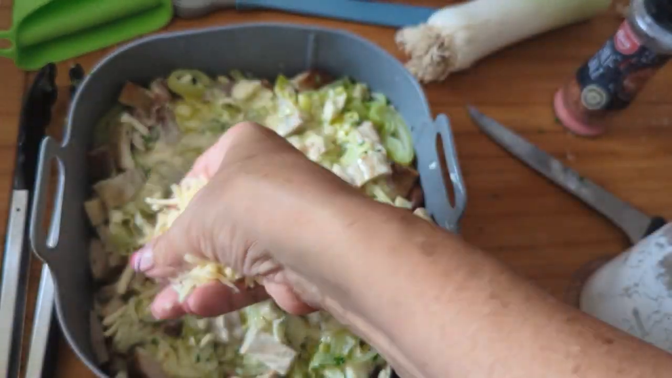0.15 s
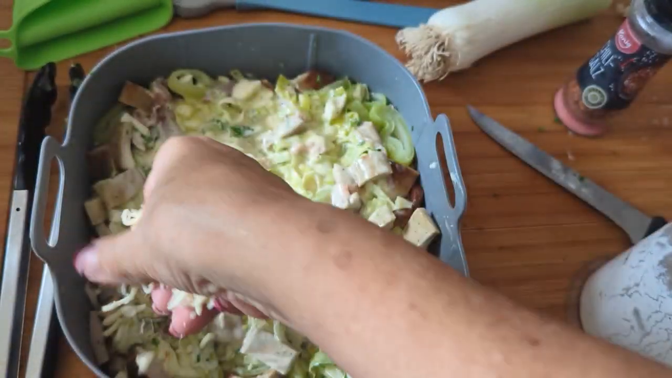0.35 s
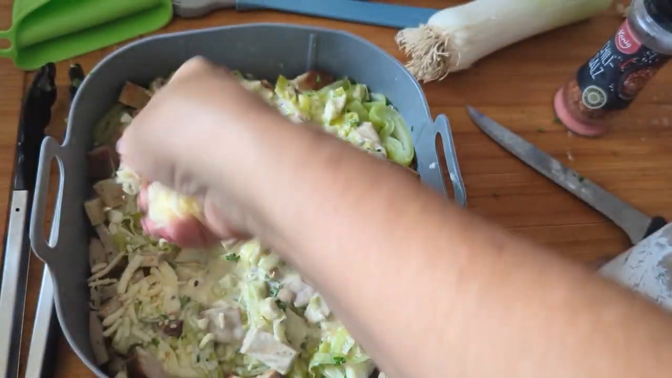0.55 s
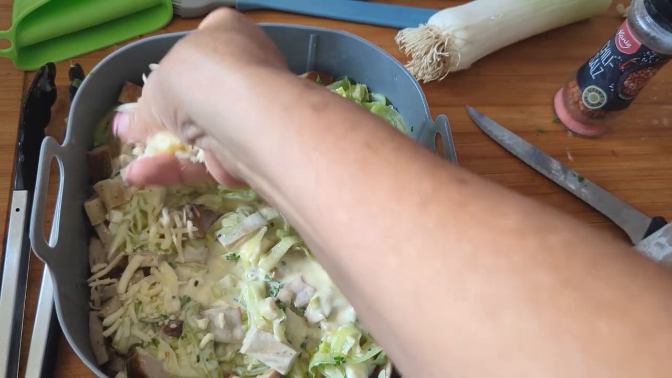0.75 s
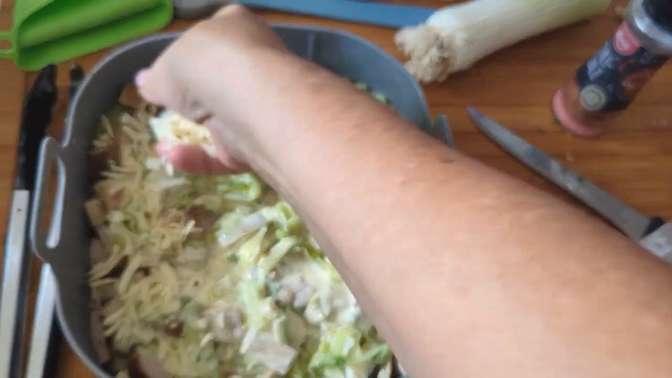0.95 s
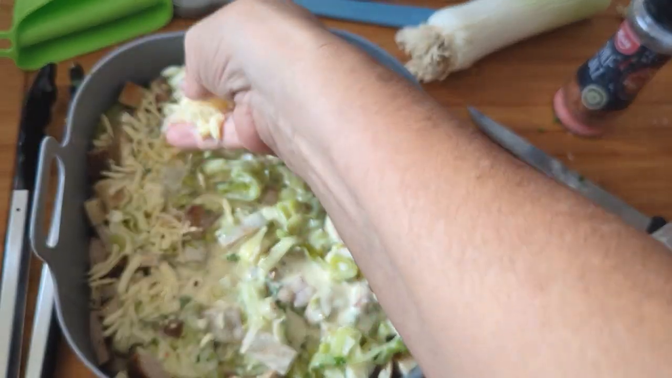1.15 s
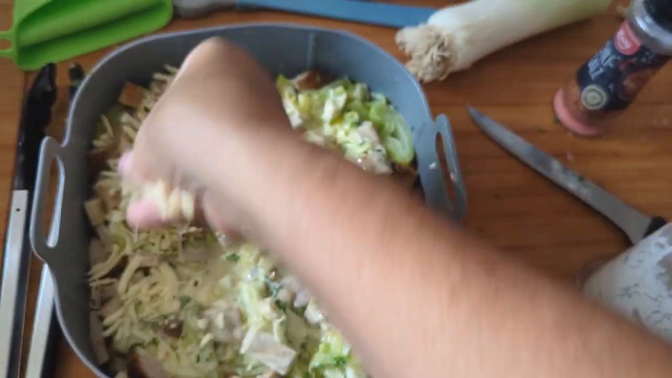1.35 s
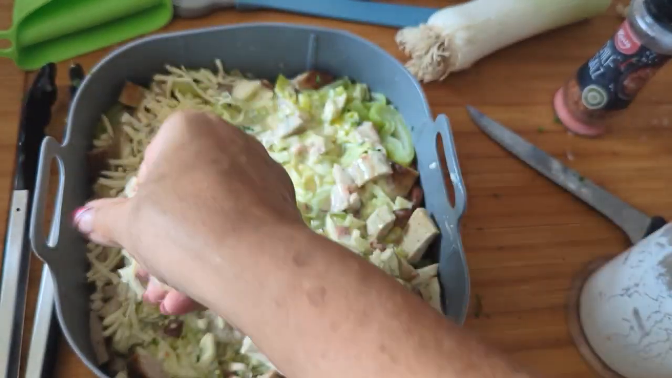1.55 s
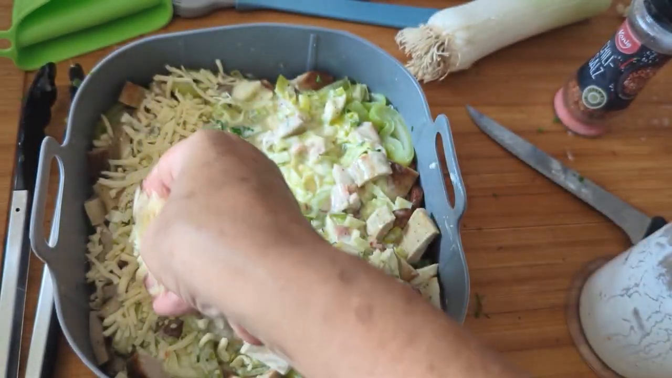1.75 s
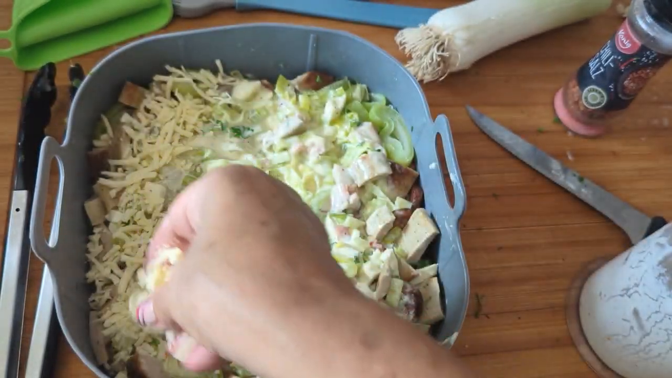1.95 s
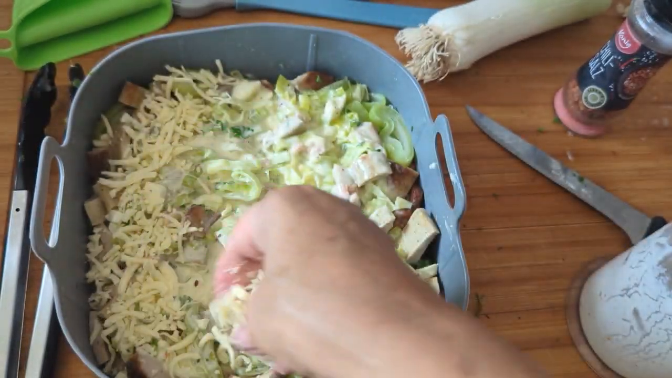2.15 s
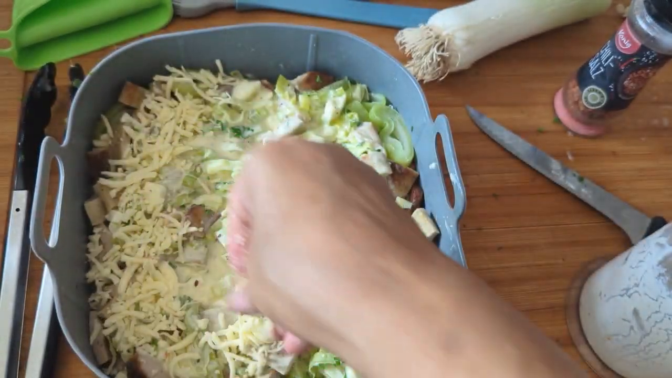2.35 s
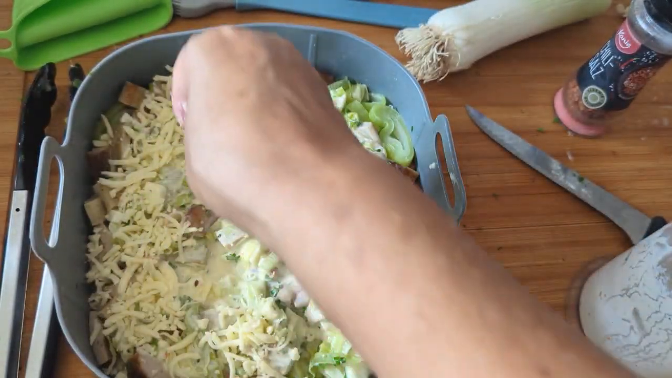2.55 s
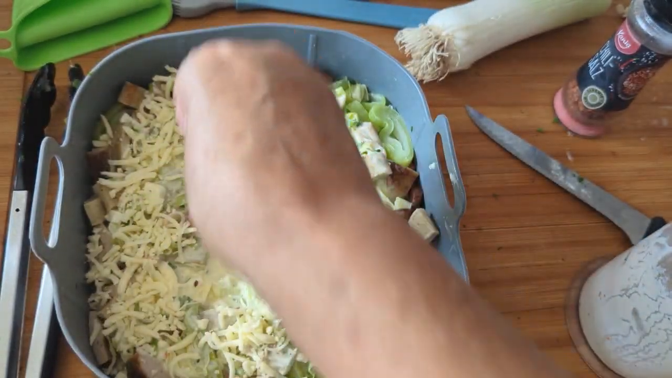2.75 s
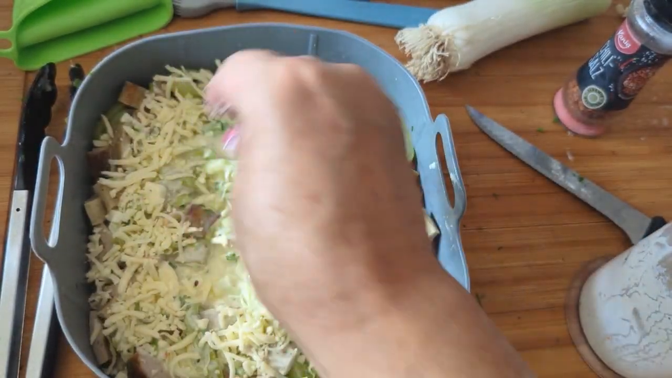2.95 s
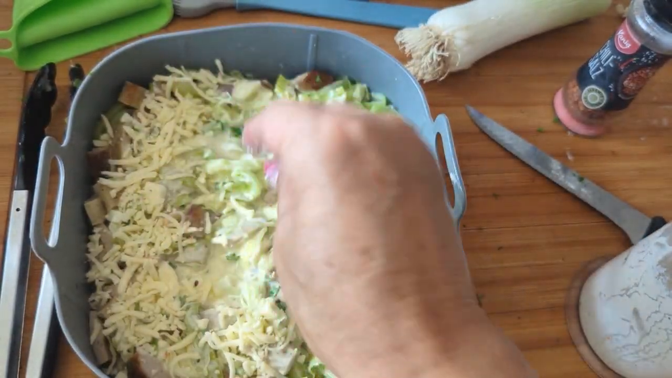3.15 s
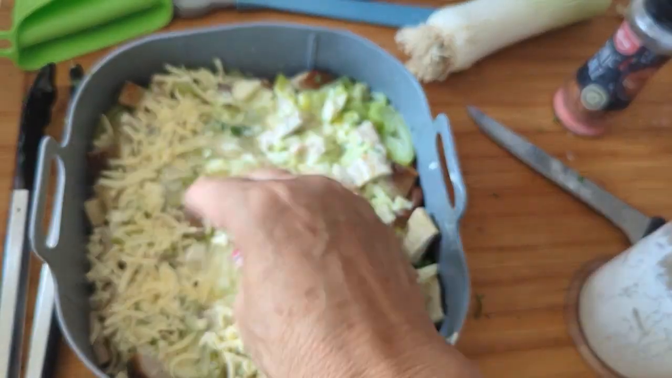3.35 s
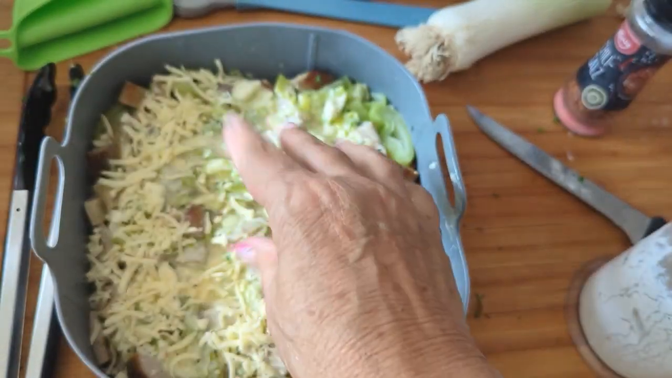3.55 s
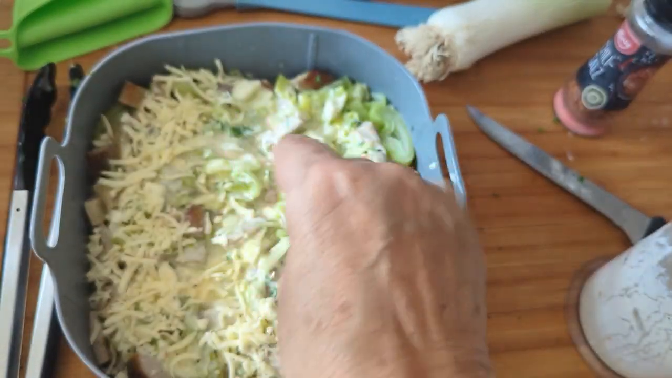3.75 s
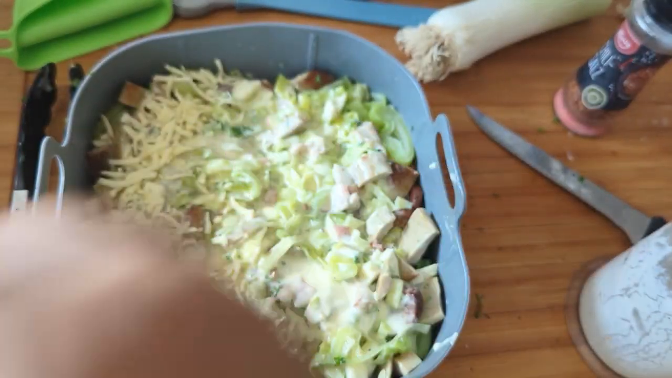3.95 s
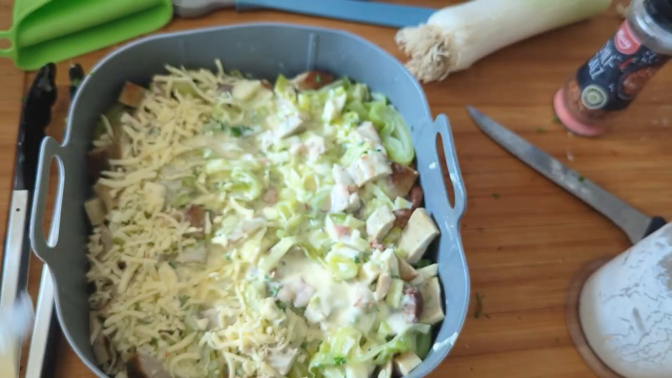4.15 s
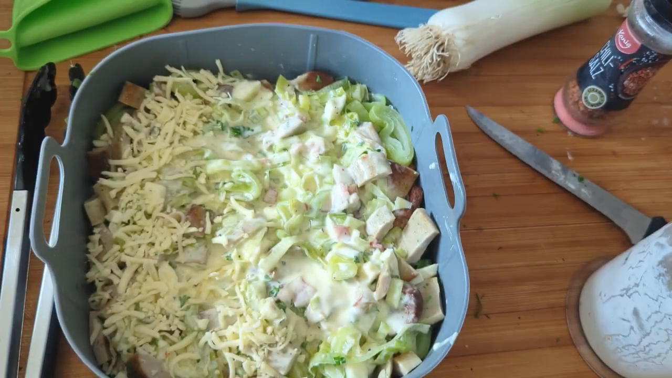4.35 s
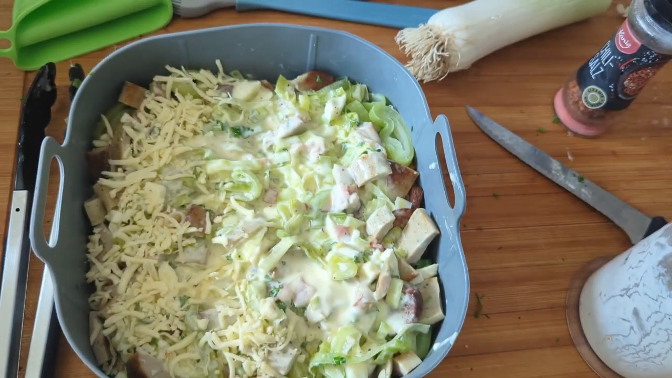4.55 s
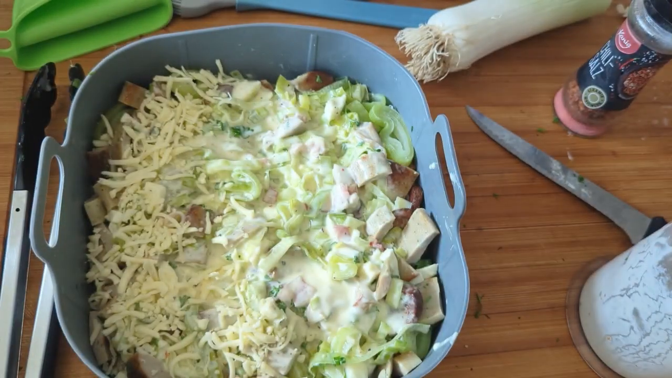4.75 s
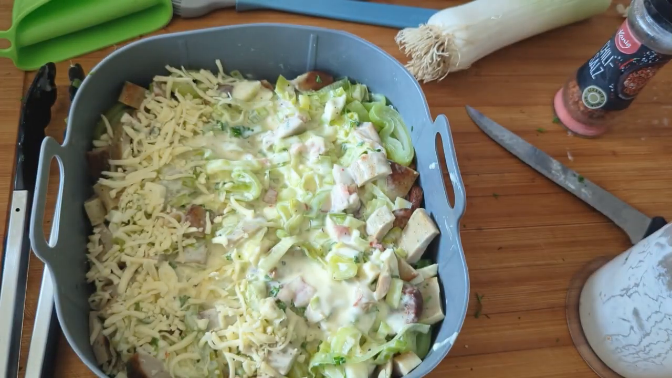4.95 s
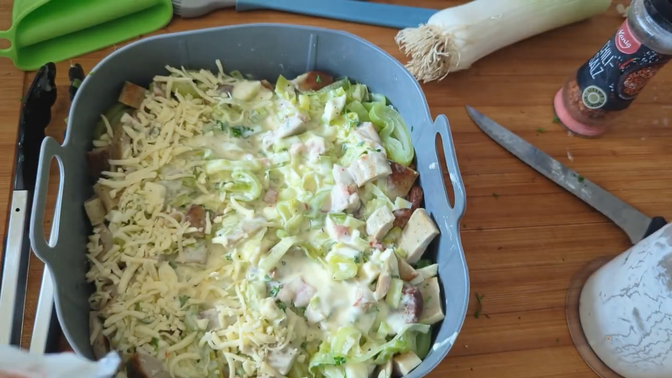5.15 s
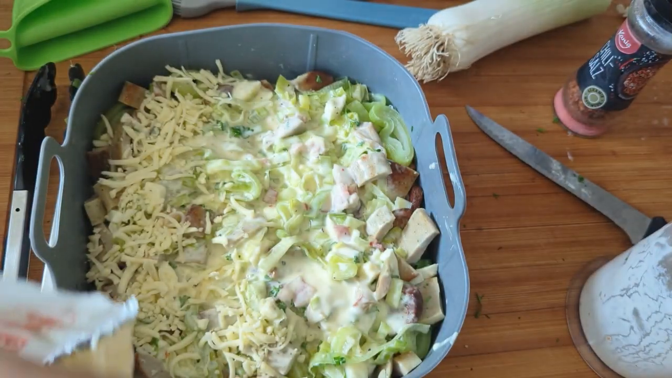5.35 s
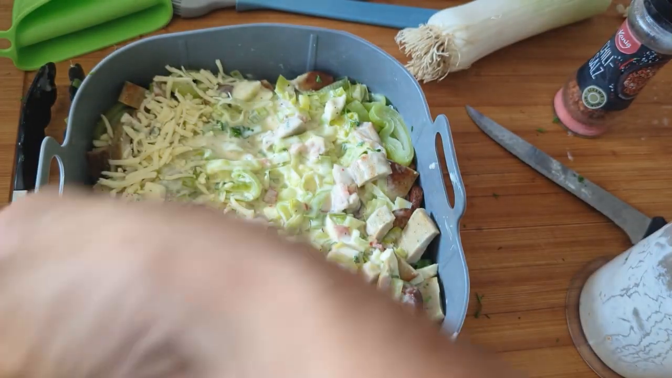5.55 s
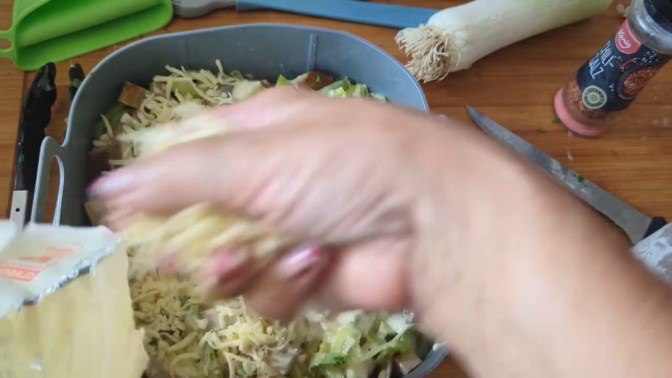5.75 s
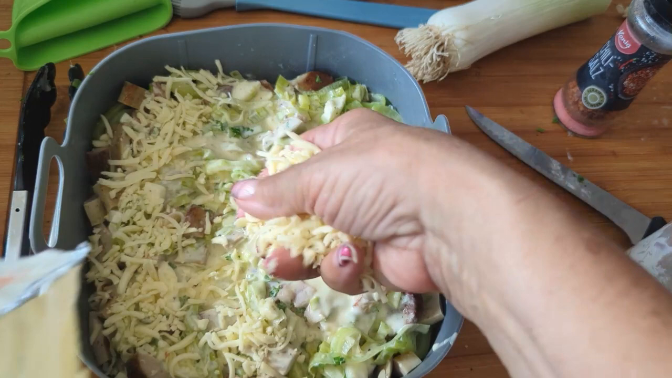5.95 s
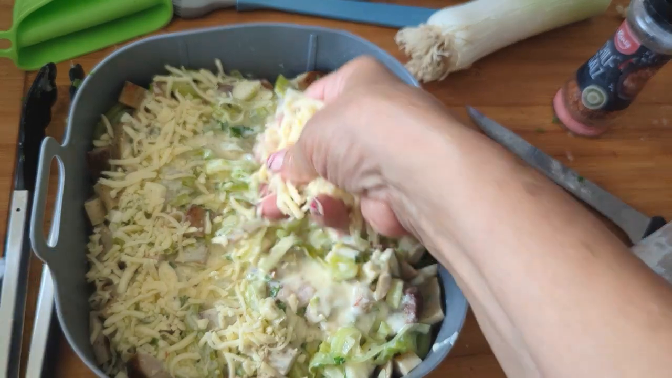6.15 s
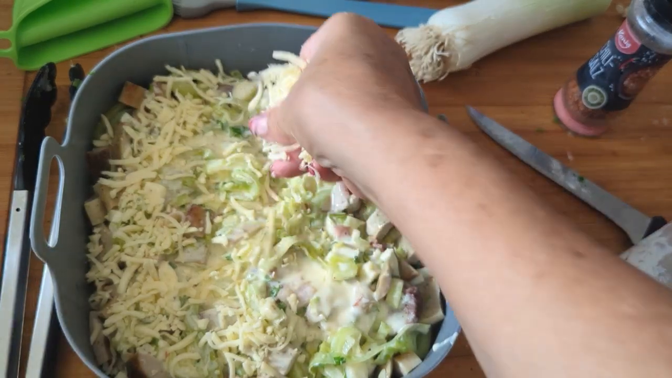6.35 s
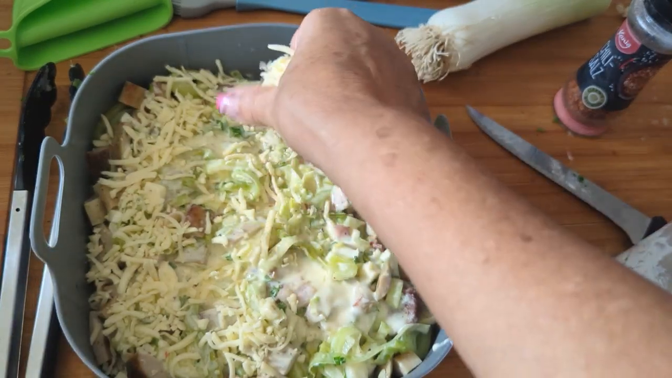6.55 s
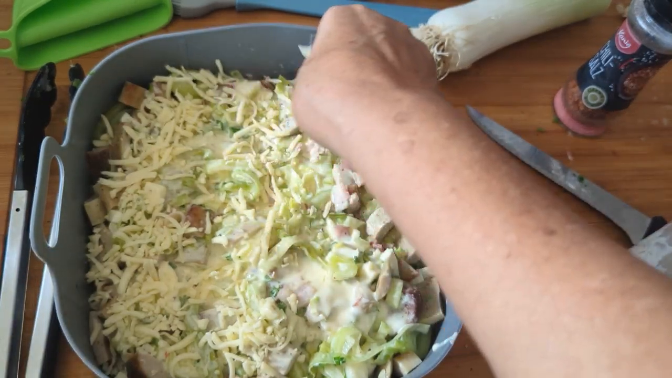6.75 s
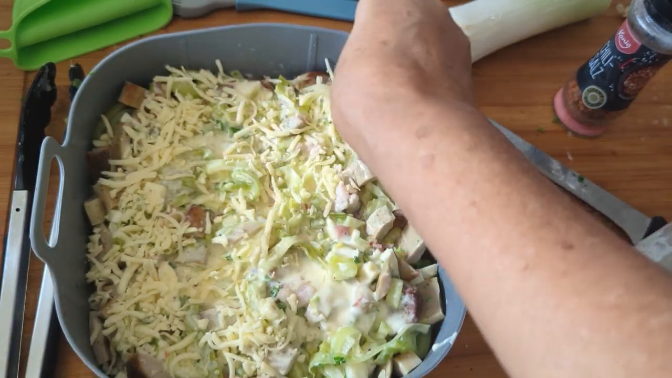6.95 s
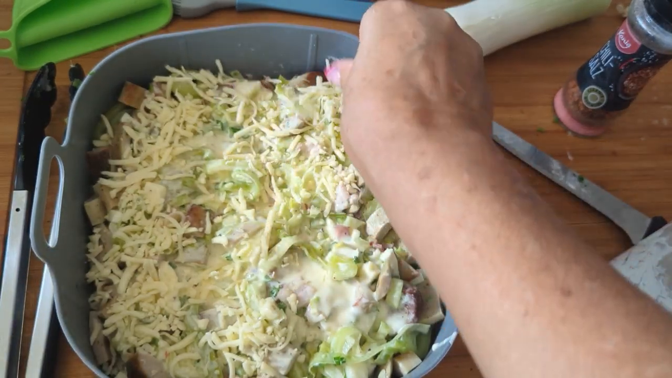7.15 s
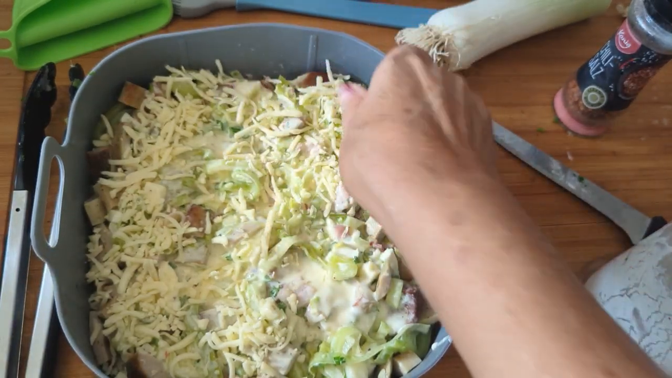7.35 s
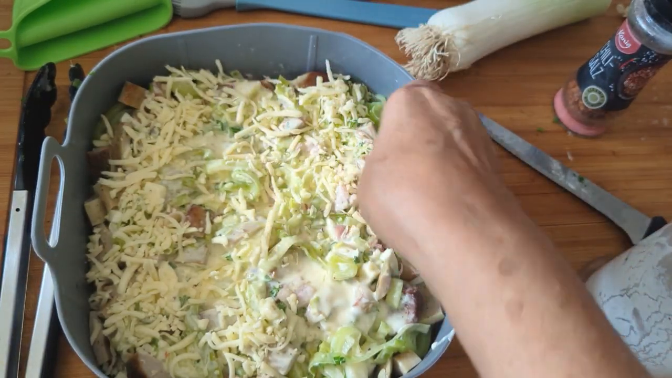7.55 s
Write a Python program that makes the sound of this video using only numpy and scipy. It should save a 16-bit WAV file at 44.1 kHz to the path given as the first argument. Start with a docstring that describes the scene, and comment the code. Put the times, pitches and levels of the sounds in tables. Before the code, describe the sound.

A plastic bag of grated cheese rustles and snaps close by for the first 0.7 seconds, with soft low thuds as the cheese shifts. From about 1 second, clumps land on a dish of food with faint, scattered pats. Between roughly 2 and 3.7 seconds, fingers rub the cheese apart and sticky shreds leave them with small moist ticks, a little clearer after 3 seconds. Near 3.8 seconds the hand digs into the bag again: dense crackling, sharp snaps and soft bumps, loudest between 4.2 and 4.9 seconds, with the strongest snap at about 4.7. The crinkling continues until nearly 6 seconds, with a distinct pat around 5.7. A few faint pats follow until about 7.6 seconds. A quiet low rumble, hum and faint hiss of a small kitchen lie underneath throughout.

```python
"""A plastic bag of grated cheese rustles as a hand digs in it, close by in a small kitchen.
Big creases in the plastic buckle with sharp snaps, while tiny ones make a dense crackle.
The cheese slumps with soft thuds. Between two handfuls, sticky shreds tick as they leave
the fingers, and clumps pat onto a dish of food. The room rumbles quietly underneath."""
import sys
import numpy as np
from scipy import signal
from scipy.fft import rfft, irfft, next_fast_len
from scipy.io import wavfile

SR = 44100
rng = np.random.default_rng(int(sys.argv[2]) if len(sys.argv) > 2 else 0)


def inscribe(sig):
    """Save sig as 16-bit PCM at rate SR to the path in sys.argv[1].

    A 1-D sig is mono; a 2-D sig holds one channel per row.
    Samples are clipped to [-1, 1] before scaling.
    """
    pcm = np.round(np.clip(np.atleast_2d(sig).T, -1, 1) * 32767)
    wavfile.write(sys.argv[1], SR, pcm.astype(np.int16))


N = 334939
TIME = np.arange(N) / SR

# Big creases buckle. Levels in all tables are relative; a positive side means left.
# (time [s], level [dB], pitch [Hz], hollowness [dB], tightness heard as treble [dB], side [dB])
SNAPS = [(0.08, -41, 2200, -10, -8, -11), (0.1814, -39, 1290, 1, 10.5, -9.5),
         (0.2219, -39, 6070, 8.5, -2, -4), (0.4304, -40, 1130, 2, -5.5, -10),
         (0.4842, -46.5, 5540, 10, 0, -4), (0.6254, -30.5, 900, -0.5, -2.5, -2.5),
         (3.468, -45, 2000, 0, -2, -7), (3.4825, -47.5, 12000, 4, -6, -1), (4.2019, -28, 2670, -6.5, 0, -1),
         (4.2521, -29, 4210, 3, -14.5, -5), (4.2886, -31, 5540, 2, 0.5, 2),
         (4.298, -36, 520, 10.5, 5.5, -3.5), (4.3515, -30, 12000, -4.5, -19, -3.5),
         (4.3836, -22, 3510, -6.5, -2.5, -6), (4.3984, -32, 3680, 16.5, -8.5, -4.5),
         (4.4243, -30.5, 1290, -2, -14.5, -1.5), (4.4273, -30, 1350, 3.5, -17, -3.5),
         (4.4373, -34.5, 520, -2, -18.5, -4.5), (4.4415, -31, 2800, 2, -13.5, -2),
         (4.5062, -37.5, 520, -5.5, -21, -3.5), (4.5341, -32.5, 5540, 11.5, -11, 1),
         (4.5521, -30, 1130, -2, -18.5, 3.5), (4.562, -30.5, 6350, 5.5, -3.5, -11.5),
         (4.5689, -36, 1620, 7.5, -13, 2.5), (4.5992, -34, 1080, 13, -10.5, -0.5),
         (4.6107, -31, 520, -8.5, -5, 1), (4.65, -33.5, 1410, 1, -16.5, -1),
         (4.6547, -30.5, 1780, 1.5, -14, -0.5), (4.6679, -29, 9130, -9, -10, -3.5),
         (4.7071, -17.5, 1030, 3.5, 11, 0.5), (4.7724, -34, 1620, -6, -18, -2.5),
         (4.782, -36.5, 1700, -3, -14, -1), (4.8844, -28, 5000, -8, -9.5, -0.5),
         (5.264, -39, 2800, -3.5, -30, -4), (5.2978, -34, 520, -9, -24, -1.5),
         (5.3483, -27, 8340, -8.5, -20, 1), (5.4907, -40, 1080, 11, -17, -5),
         (5.5971, -32.5, 1180, -8, -26, -5), (5.647, -35.5, 520, 17, -17, -13),
         (5.741, -38.5, 5060, -3, -24, -5), (5.7864, -37.5, 520, 15.5, -15.5, -2),
         (5.843, -52, 3070, -4, -5, 2), (5.9139, -55.5, 520, -1, -23, -4)]
# Tight corners of the plastic ping: (time [s], level [dB], pitch [Hz])
PINGS = [(0.3667,-48,7900),(0.4085,-42,7900)]
# The hand drags through the bag; cheese and fizz are counted from the crackle level.
# (start [s], rise [s], length [s], crackle [dB], shifting cheese [dB], sliding fizz [dB])
STROKES = [(0.0, 0.0032, 0.11, -57, -4.5, 4), (0.049, 0.026, 0.17, -49, -5, 3),
           (0.335, 0.048, 0.11, -63, -8, -1.5), (0.422, 0.0096, 0.046, -53, -0.5, -1),
           (3.839, 0.063, 0.2, -57, -4, 0.5), (4.047, 0.025, 0.14, -66.5, -2, 2),
           (4.124, 0.024, 0.062, -48.5, -18, -6.5), (4.192, 0.016, 0.2, -45, -3.5, 0),
           (4.341, 0.017, 0.068, -39.5, 0, -6.5), (4.422, 0.008, 0.018, -40.5, 1.5, -2),
           (4.457, 0.012, 0.041, -46, -5, -2), (4.533, 0.013, 0.067, -42.5, -5.5, -7.5),
           (4.634, 0.012, 0.014, -42, -5, 0.5), (4.727, 0.029, 0.054, -49, -3.5, 4),
           (4.804, 0.016, 0.069, -54, -11, -4), (4.904, 0.018, 0.041, -44.5, -4.5, -9),
           (4.94, 0.1, 0.22, -46.5, -6.5, -10), (5.157, 0.029, 0.17, -51, -6, -8),
           (5.338, 0.021, 0.15, -53.5, -5, 0.5), (5.469, 0.092, 0.13, -45, -5, -4.5),
           (5.589, 0.051, 0.09, -41.5, -3, -7), (5.698, 0.018, 0.099, -48.5, 0, -12)]
# Tone of the plastic pulled tight at first: (frequency [Hz], level [dB])
TIGHT_PLASTIC = [(59, -36.5), (100, -18), (197, -2), (452, -4), (513, -7.5), (736, -13), (1310, -2),
                 (1610, -6.5), (2040, -0.5), (2990, -10.5), (9020, -17.5), (12100, -19.5), (16000, -24)]
# Tone of the slack plastic later on: (frequency [Hz], level [dB])
SLACK_PLASTIC = [(59, -34), (100, -2.5), (239, -3), (302, -3.5), (398, 0.5), (461, -9.5), (524, -6),
                 (648, -12), (1170, -6.5), (1830, -10), (2130, -8.5), (4980, -19.5), (5770, -22),
                 (11600, -26), (16000, -29.5)]
# Steady narrow peaks that colour every snap and rustle, as from nearby kitchen surfaces:
# (frequency [Hz], width [Hz], boost [dB])
FIXED_COLOUR = [(253.4,50,4),(505.5,70,5.5),(820,11,5),(979,38,8),(1167,50,4),(1321,75,2.5),(1630,42,2.5),(2600,63.5,2),(2740,51,4.5),(3430,110,2),(7900,1600,0),(11850,1500,-0.5)]
# The cheese slumps and the hand moves about: (time [s], level [dB], pitch [Hz])
THUDS = [(0.223, -49, 59), (.438, -44, 140), (0.439, -45, 58), (1.86, -50, 50), (4.39, -50, 124),
         (4.59, -40, 624), (4.836, -36, 470), (5.724, -39, 534), (5.886, -42, 486)]
# Fingers rub the cheese apart: (start [s], length [s], level [dB])
RUBS = [(2.0, 0.43, -87), (2.47, 0.04, -79), (3.122, 0.094, -71.5), (3.298, 0.057, -74),
        (3.446, 0.043, -66), (3.59, 0.05, -80.5), (5.83, 0.13, -79)]
# Sticky shreds leave the fingers: (time [s], level [dB])
TICKS = [(1.872, -59.5), (1.979, -58.5), (2.0415, -57.5), (2.086, -58.5), (2.1484, -62.5), (2.249, -58),
         (2.2688, -55), (2.394, -56.5), (2.458, -56), (2.504, -56.5), (2.7773, -64), (2.8737, -62),
         (3.157, -47.5), (3.268, -56.5), (3.3133, -49.5), (3.364, -64), (3.4196, -51.5), (3.467, -45.5),
         (3.623, -51)]
# Tone of the shreds: (frequency [Hz], level [dB])
SHRED_TONE = [(500,-10),(1500,11.5),(3000,9),(7000,2),(12000,-5.5),(16000,-8)]
# Clumps of cheese land: (time [s], level [dB], pitch [Hz])
PATS = [(1.053, -51.5, 1320), (1.198, -58.5, 1340), (1.479, -59.5, 1500), (1.563, -57, 2020),
        (2.042, -55, 1210), (2.275, -56, 1160), (2.333, -60, 2600), (2.396, -55.5, 1740),
        (2.503, -57, 1170), (3.22, -47.5, 1680), (3.58, -56.5, 990), (3.774, -52.5, 1090),
        (5.703, -35, 1170), (5.87, -44, 1280), (5.886, -60, 1430), (5.949, -49, 1413), (6.05, -54, 988),
        (6.308, -56, 1000), (6.594, -56.5, 1476), (7.159, -56.5, 1420), (7.58, -54, 1200)]
# Tone of the room's noise, before it is split into bands: (frequency [Hz], level [dB])
ROOM_TONE = [(20,-44),(31,-24),(45,-1.5),(70,-6.5),(114,-5),(145,-1),(263,-12),(344,-8.5),(463,-20),(796,-35),(1500,-30),(2050,-36),(3700,-34.5),(4300,-43.5),(5200,-45),(6300,-50.5),(8000,-54.5),(16000,-60)]
# The background wavers slowly: (time [s], murmur [dB], hiss [dB], high hiss [dB])
ROOM_LEVELS = [(0, -60.5, -62.5, -56.5), (0.58, -58, -68, -75), (0.852, -59, -64.5, -68),
               (1.4, -62.5, -69.5, -78.5), (2.8, -63.8, -71, -76), (3.35, -60.5, -67.5, -75.5),
               (3.7, -62, -69, -71.5), (6.1, -58.5, -68.5, -75), (6.7, -62, -70, -78.5),
               (7.099, -64, -74, -82.5), (7.59, -62, -66, -79)]
# The kitchen's echo: (frequency [Hz], time to fade by 60 dB [s])
ECHO_TIMES = [(200,0.17),(1000,.38),(3000,.36),(7000,0.26),(15000,0.17)]
# How alike left and right sound: (frequency [Hz], likeness [0 to 1])
LIKENESS = [(50,.8),(300,0.85),(600,0.47),(1200,0.11),(3000,0.054),(10000,0.033)]
# The microphone's openings weaken two narrow bands: (frequency [Hz], width [Hz], level [dB])
MIC_DIPS = [(4040,340,-2),(9850,360,-6.5)]


def snaps(lead_s=0.0056, lead_db=-21, left_treble_db=5):
    """Big creases buckle, each with the note of its own patch of plastic; small ones go just before."""
    out = np.zeros((2, N))
    for start, db, note_hz, hollow_db, tight_db, side_db in SNAPS:
        # tight plastic snaps short and bright, slack plastic longer and duller
        bright_db, fizz_db = 1.05 * tight_db + 4.9, 1.2 * tight_db + 0.5
        ring_s = 0.0004 * np.exp(-0.056 * fizz_db)
        tone = [(60, hollow_db - 10.5), (300, hollow_db - 10), (900, hollow_db), (2500, 0),
                (6000, bright_db), (12000, fizz_db), (16000, fizz_db - 13.5)]
        patch = [(note_hz, 0.35 * note_hz, 7)]  # a broad 7 dB boost around the note
        snap = crack(ring_s, shiver_gain=0.96, scatter_db=1, scatter_s=0.0027)
        snap = colour(snap, lambda hz: curve(tone, hz) + bumps(FIXED_COLOUR, hz) + bumps(patch, hz))
        snap = amp(db - 7.5) * pan(side_db) * unit(snap)
        add(out, start, snap)
        for ahead in rng.random(5):
            add(out, start - ahead * lead_s, amp(lead_db - 9.7 * ahead) * snap)
    for start, db, hz in PINGS:
        add(out, start, amp(db - 10.5) * pan(-1.5) * knock(hz, cycles=3))
    # the left side picks up more of the highest treble
    out[:1] = colour(out[:1], lambda hz: left_treble_db * curve([(8500, 0.017), (10500, 0.64)], hz))
    return kitchen(out, early_db=-11, early_s=0.0049, late_db=-9.5)


def rustle(slack_from_s=2, release_s=0.028):
    """The hand drags: plastic crackles and pops, skin slides on it, cheese shifts and the bag bumps."""
    popping = pops(per_s=340, spread_db=3.5, low_hz=600, high_hz=3630, cycles=1.6)
    grains = creases(per_s=1200, spread_db=3) + amp(-6) * popping
    grains = kitchen(grains, early_db=-6, early_s=0.012, late_db=-7.5)
    sliding = amp(-2) * rng.standard_normal((2, N))
    bag_bump = amp(-7) * band(stereo_noise(N), 45, 140)
    out = np.zeros((2, N))
    for is_slack, tone, side_db in [(False, TIGHT_PLASTIC, -2.5), (True, SLACK_PLASTIC, -1.7)]:
        crackle, hiss = (colour(x, lambda hz: curve(tone, hz) + bumps(FIXED_COLOUR, hz))
                         for x in (grains, sliding))
        cheese = amp(-0.5) * band(crackle, 110, 600) + bag_bump
        plastic = amp(0.5) * band(crackle, 600, 4027)
        fizz = amp(-1) * band(crackle + hiss, 4000, 15000)
        power = np.zeros((3, N))
        for start, rise_s, length, db, cheese_db, fizz_db in STROKES:
            if (start > slack_from_s) == is_slack:
                # each stroke dies away as the plastic settles
                effort = amp(db) * gesture(start, length, rise_s, release_s)
                power += (effort * amp([[0], [cheese_db], [fizz_db]])) ** 2
        plastic_gain, cheese_gain, fizz_gain = np.sqrt(power)
        out += pan(side_db) * (plastic * plastic_gain + cheese * cheese_gain + fizz * fizz_gain)
    return out


def thuds(cycles=1.3):
    """Slumping cheese and the moving hand make soft blows, each a few swings of a low note."""
    out = np.zeros((2, N))
    t = np.arange(4000) / SR
    for start, db, hz in THUDS:
        age = t * hz / cycles
        swell = 2 * age * np.exp(1 - 2 * age)
        add(out, start, amp(db) * pan(-2.5) * swell * np.sin(2 * np.pi * hz * t))
    return kitchen(out, early_db=-9.5, early_s=0.0056, late_db=-9)


def sprinkle(peel_s=0.0011):
    """Moist shreds peel off the fingers with a short hiss and a tick, and patter onto the dish."""
    rubbing = sum(amp(db) * gesture(start, length, rise_s=0.012, release_s=0.056)
                  for start, length, db in RUBS)
    shreds = amp(-1) * creases(per_s=750, spread_db=8.5) * rubbing
    t = np.arange(-900, 900) / SR  # the hiss swells before the tick and fades after it
    for start, db in TICKS:
        hiss = np.exp(-abs(t) / peel_s) * rng.standard_normal((2, len(t)))
        tick = crack(ring_s=0.0013, shiver_gain=1, scatter_db=-0.48, scatter_s=0.0019)
        add(shreds, start + t[0], amp(db - 9) * hiss)
        add(shreds, start, amp(db - 17.5) * tick)
    landings = pops(per_s=600, spread_db=3, low_hz=1000, high_hz=3200, cycles=1.3)
    out = colour(shreds, lambda hz: curve(SHRED_TONE, hz)) + amp(3) * landings * rubbing
    return kitchen(pan(-2.4) * out, early_db=1, early_s=0.0043, late_db=-6.5)


def pats():
    """Soft clumps land with a short, quickly fading note and a wet smack."""
    out = np.zeros((2, N))
    for start, db, hz in PATS:
        smack = crack(ring_s=0.0022, shiver_gain=1.5, scatter_db=6.3, scatter_s=0.0012)
        add(out, start, amp(db - 15) * pan(-2.3) * knock(hz, cycles=1.7))
        add(out, start, amp(db - 20.5) * pan(-0.44) * band(smack, 1100, 3300))
    return kitchen(out, early_db=-1, early_s=0.0055, late_db=-7.5)


def kitchen(x, early_db, early_s, late_db):
    """Adds quick echoes off the worktop and cupboards, then a tail that lasts longest in the mid range."""
    size = SR // 2
    t = np.arange(size) / SR
    arrival = np.clip((t - 0.002) / 0.002, 0, 1)  # echoes start after 2 ms
    early = stereo_noise(size) * arrival * np.exp(-t / early_s)
    hz, age, bands = signal.stft(stereo_noise(size), SR, nperseg=256)
    fade = amp(-60 * age / curve(ECHO_TIMES, hz)[:, None])
    late = signal.istft(bands * fade, SR, nperseg=256)[1][:, :size] * arrival
    echo = (amp(early_db) * unit(early) + amp(late_db) * unit(late)) / np.sqrt(size)
    return x + signal.oaconvolve(x, echo, axes=1)[:, :N]


def room_tone():
    """The room rumbles, with a hum from the mains power, a murmur and a faint hiss."""
    size = next_fast_len(N, True)
    tone = amp(curve(ROOM_TONE, np.fft.rfftfreq(size, 1 / SR)))
    noise = irfft(rfft(stereo_noise(size)) * tone, size)[:, :N]
    times, *levels = np.transpose(ROOM_LEVELS)
    murmur_gain, hiss_gain, high_gain = (amp(np.interp(TIME, times, db)) for db in levels)
    rumble = amp(-60.5) * band(noise, 40, 95)
    hum = amp(-64) * np.sin(2 * np.pi * 50 * TIME)
    murmur = amp(0.8) * band(noise, 100, 580) * murmur_gain
    hiss = band(noise, 680, 2000) * hiss_gain + band(noise, 1800, 18000) * high_gain
    return pan(-0.54) * (rumble + hum + murmur + hiss)


def crack(ring_s, shiver_gain, scatter_db, scatter_s, size=900):
    """One crease flips: a click and a brief shiver of the sheet, reaching the right side first."""
    t = np.arange(size) / SR
    swell = t / ring_s * np.exp(-2 * t / ring_s)
    shiver = unit(swell * (rng.standard_normal(size) + 0.69 * stereo_noise(size)))
    scatter = unit(np.exp(-t / scatter_s) * stereo_noise(size))
    click = unit(1.0 * (t == 0)) * rng.choice([-1, 1])
    left, right = click + shiver_gain * shiver + amp(scatter_db) * scatter
    lag = rng.integers(4, 16)  # samples
    late_left = np.r_[np.zeros(lag), left[:-lag]]
    return unit(np.array([late_left, right]))


def knock(hz, cycles):
    """A crack sets off one quickly fading note in the plastic or the food."""
    t = np.arange(700) / SR
    note = np.sin(2 * np.pi * hz * t) * np.exp(-t * hz / cycles)
    hit = crack(ring_s=0.0005, shiver_gain=0.74, scatter_db=-1.7, scatter_s=0.00294)
    return unit(signal.fftconvolve(hit, note[None], axes=1))


def creases(per_s, spread_db):
    """A shower of tiny dry cracks."""
    cracks = [crack(ring_s=0.0005, shiver_gain=0.88, scatter_db=2, scatter_s=0.0007) for _ in range(40)]
    return shower(cracks, per_s, spread_db)


def pops(per_s, spread_db, low_hz, high_hz, cycles):
    """A shower of small pops at many different pitches."""
    return shower([knock(hz, cycles) for hz in np.geomspace(low_hz, high_hz, 60)], per_s, spread_db)


def shower(grains, per_s, spread_db):
    """Scatters tiny sounds at random times, mostly weak, a few strong."""
    gains = amp(spread_db * np.minimum(rng.exponential(1, N), 3.5))
    happens = rng.random(N) < per_s / SR
    which = rng.integers(0, len(grains), N)
    out = np.zeros((2, N))
    for i in np.flatnonzero(happens):
        add(out, i / SR, gains[i] * grains[which[i]])
    return unit(out)


def gesture(start, length, rise_s, release_s):
    """Loudness of one hand movement: it rises, holds, then fades."""
    age = TIME - start
    return np.clip(age / rise_s, 0, 1) * np.exp(-np.maximum(age - length, 0) / release_s)


def stereo_noise(size):
    """Left and right noise, alike in the bass as at two nearby microphone openings."""
    left, other = rfft(rng.standard_normal((2, size)))
    likeness = curve(LIKENESS, np.fft.rfftfreq(size, 1 / SR))
    right = likeness * left + np.sqrt(1 - likeness ** 2) * other
    return irfft(np.array([left, right]), size)


def colour(x, db_of_hz, size=2048):
    """Shapes the tone with a dB curve; nothing rings ahead of a hit, so it stays sharp."""
    log_gain = np.log(amp(db_of_hz(abs(np.fft.fftfreq(size, 1 / SR)))))
    taps = np.fft.ifft(np.exp(np.conj(signal.hilbert(log_gain)))).real
    return signal.oaconvolve(x, taps[None, :size // 2], axes=1)[:, :x.shape[1]]


def band(x, low_hz, high_hz):
    """Keeps one range of frequencies, at an average strength of 1."""
    sos = signal.butter(3, [low_hz, high_hz], "band", fs=SR, output="sos")
    return unit(signal.sosfilt(sos, x))


def bumps(peaks, hz):
    """Adds up rounded peaks or dips, in dB."""
    return sum(db / (1 + (2 * (hz - centre) / width) ** 2) for centre, width, db in peaks)


def curve(points, hz):
    """Reads between a table's points, with frequency spaced by octaves."""
    frequencies, values = np.transpose(points)
    return np.interp(np.log(hz + 1), np.log(frequencies + 1), values)


def amp(db):
    """Turns decibels into a gain."""
    return 10 ** (np.asarray(db) / 20)


def unit(x):
    """Scales to an average strength (rms) of 1."""
    return x / np.sqrt(np.mean(x ** 2) + 1e-20)


def pan(db):
    """Left and right gains; positive dB leans left."""
    return unit(amp([[db / 2], [-db / 2]]))


def add(mix, start, sound):
    """Mixes a stereo sound in at a time in seconds."""
    part = mix[:, max(round(start * SR), 0):][:, :sound.shape[1]]
    part += sound[:, :part.shape[1]]


def scene():
    """Bag, cheese and room together."""
    return snaps() + rustle() + thuds() + sprinkle() + pats() + room_tone()


def record(dry, low_cut_hz=32, high_cut_hz=16200):
    """The microphone's openings colour the sound; the deepest bass and highest treble are cut."""
    heard = colour(dry, lambda hz: bumps(MIC_DIPS, hz))
    low_cut = signal.butter(6, low_cut_hz, "high", fs=SR, output="sos")
    high_cut = signal.firwin(255, high_cut_hz, window=("kaiser", 9), fs=SR)
    return signal.oaconvolve(signal.sosfilt(low_cut, heard), high_cut[None], "same", axes=1)


dry = scene()
out = record(dry)
inscribe(out)
```